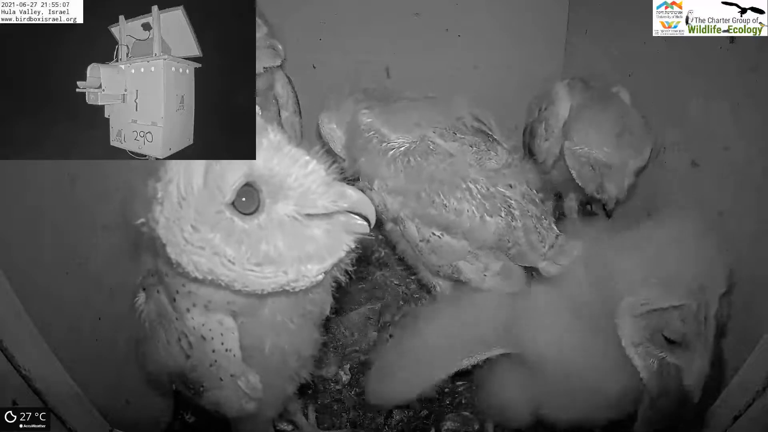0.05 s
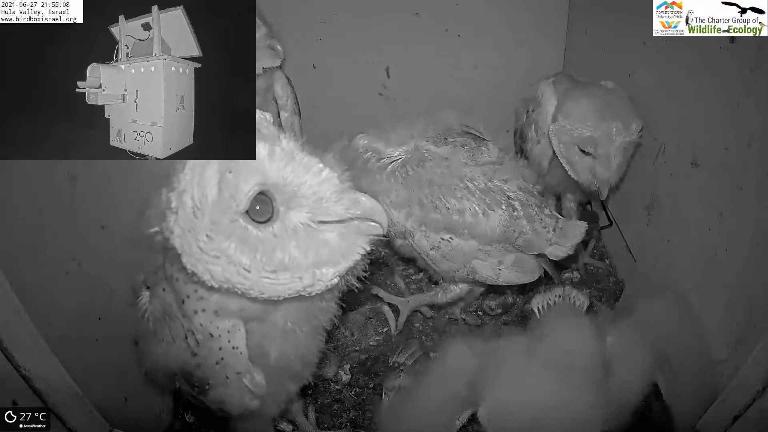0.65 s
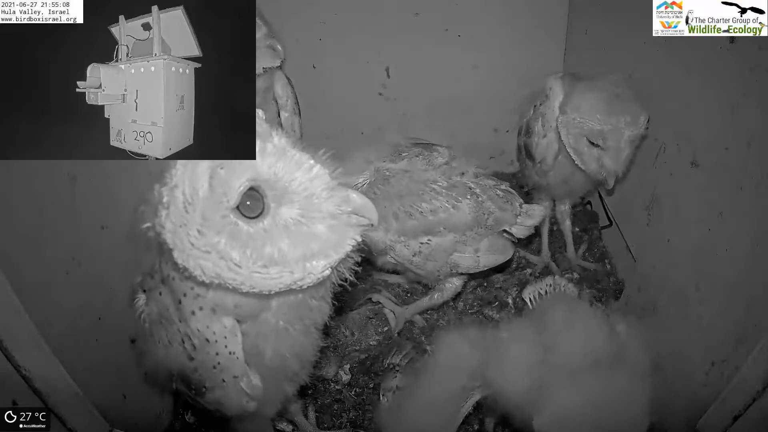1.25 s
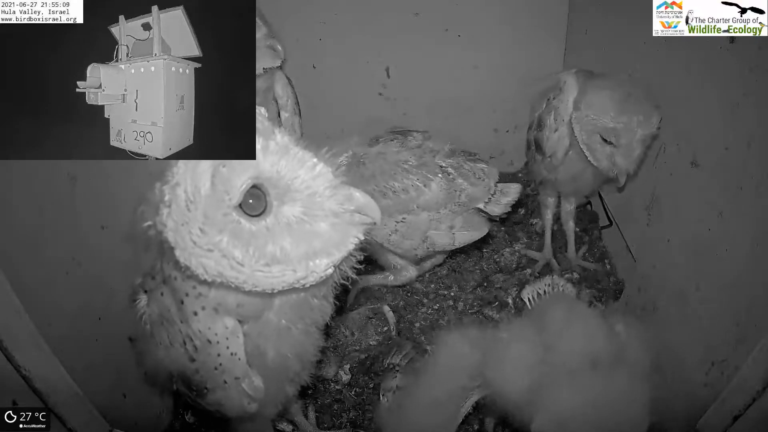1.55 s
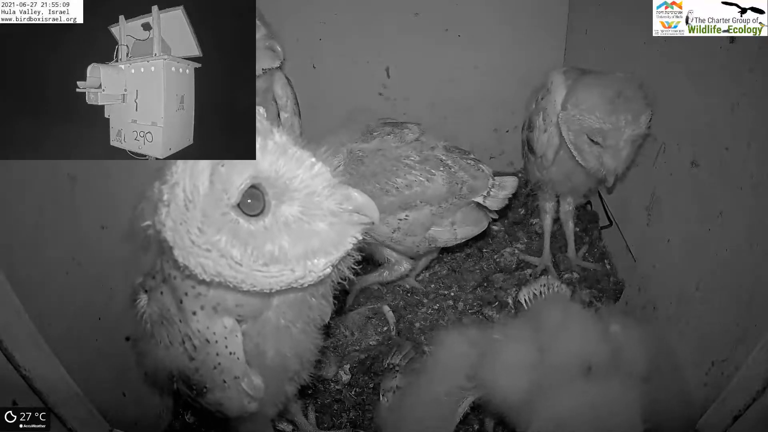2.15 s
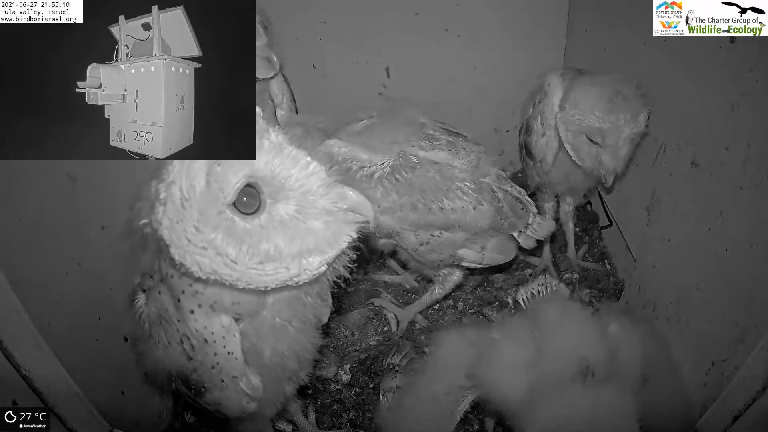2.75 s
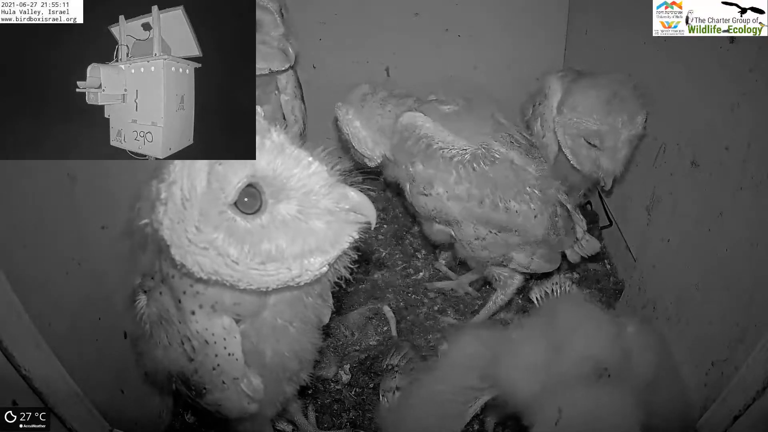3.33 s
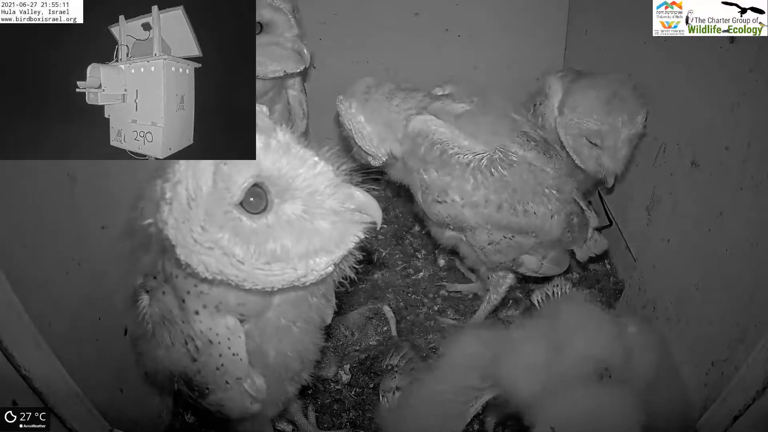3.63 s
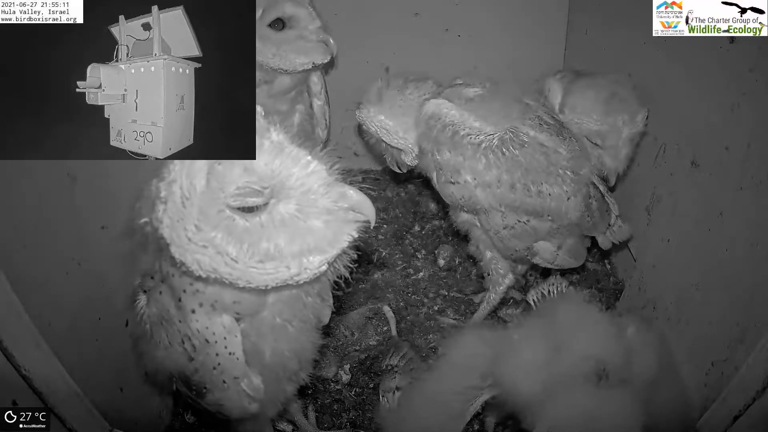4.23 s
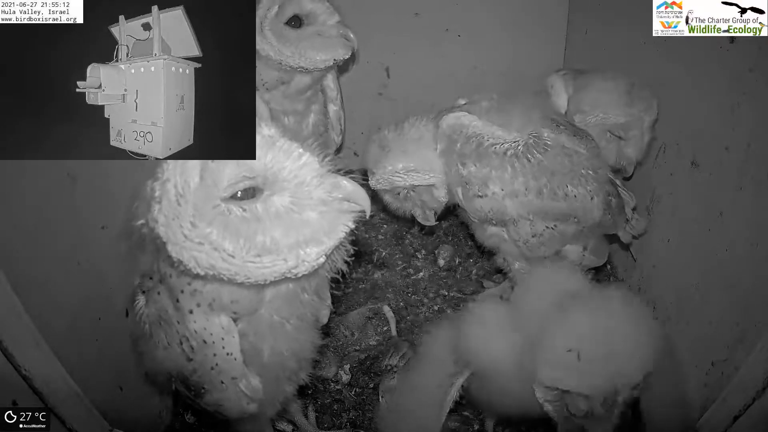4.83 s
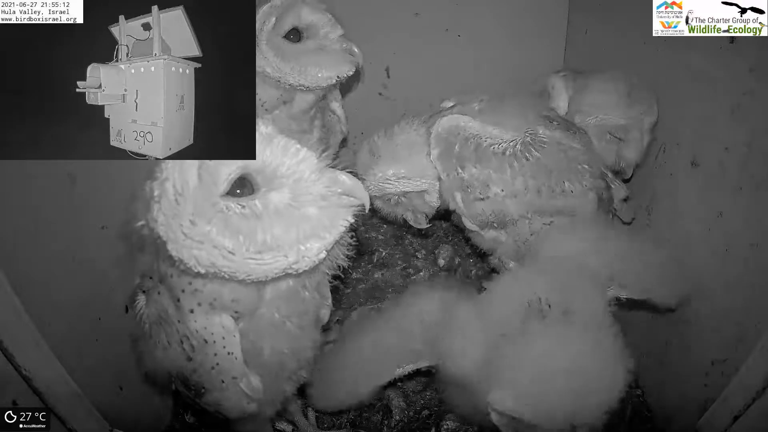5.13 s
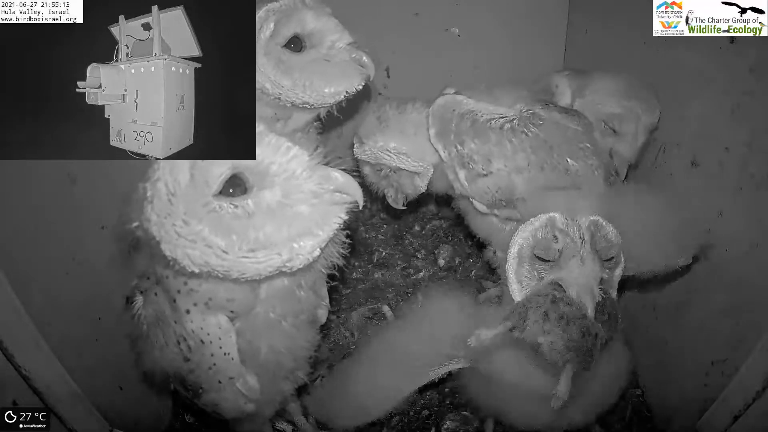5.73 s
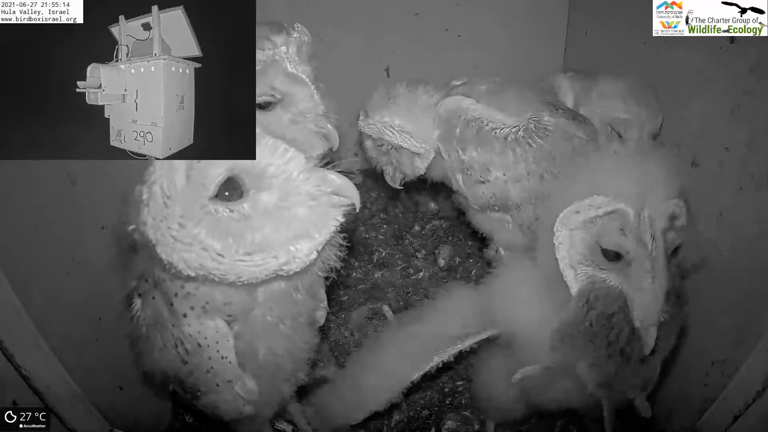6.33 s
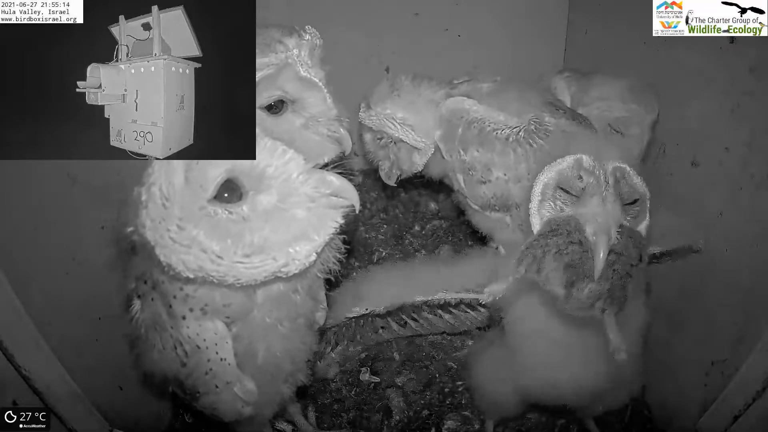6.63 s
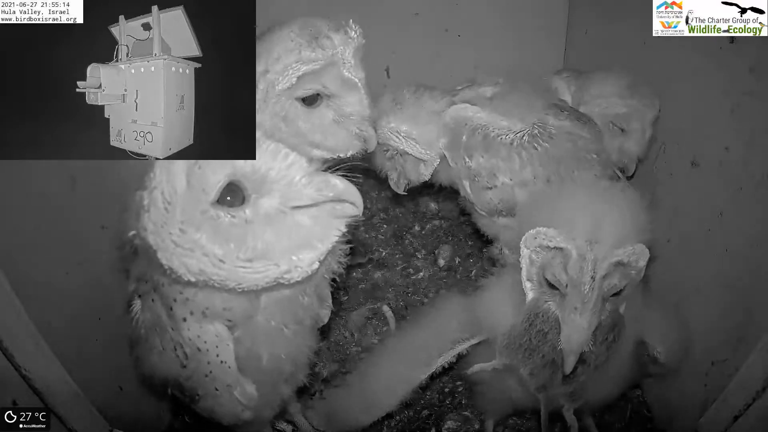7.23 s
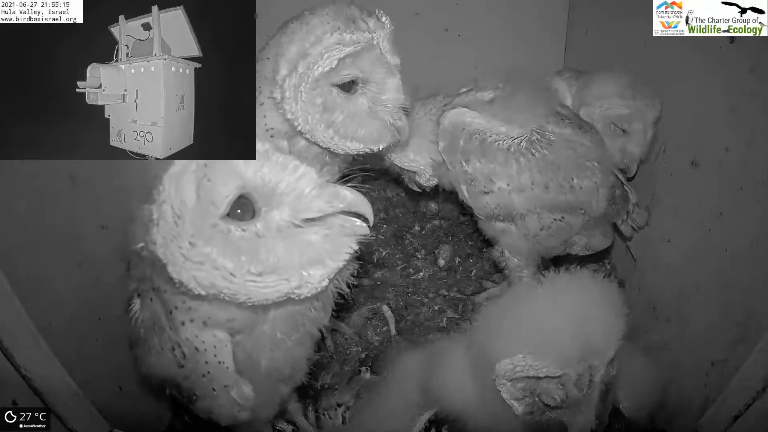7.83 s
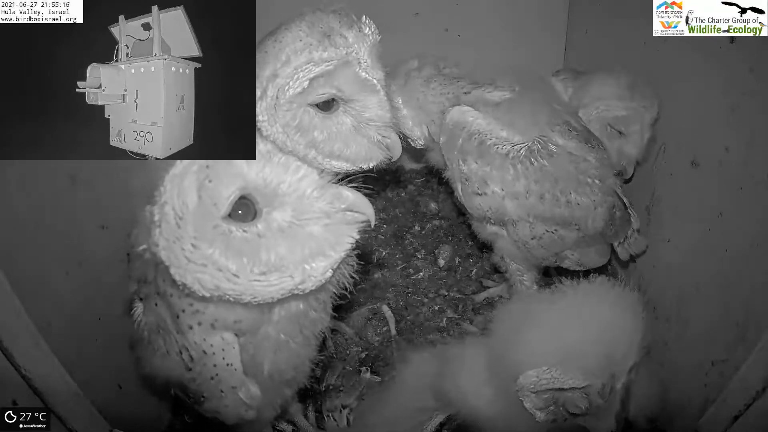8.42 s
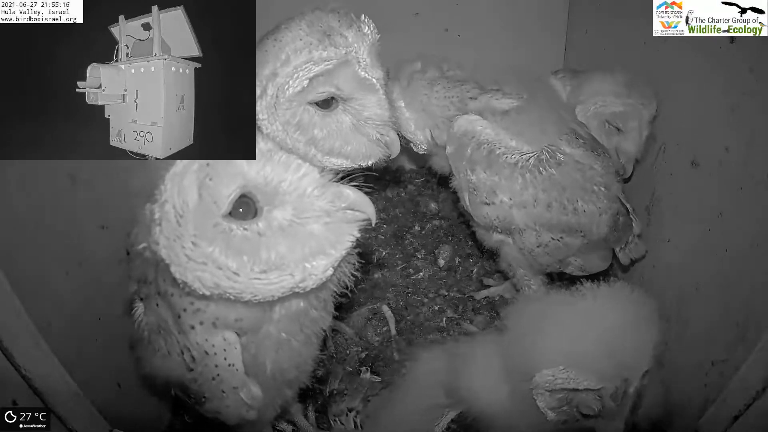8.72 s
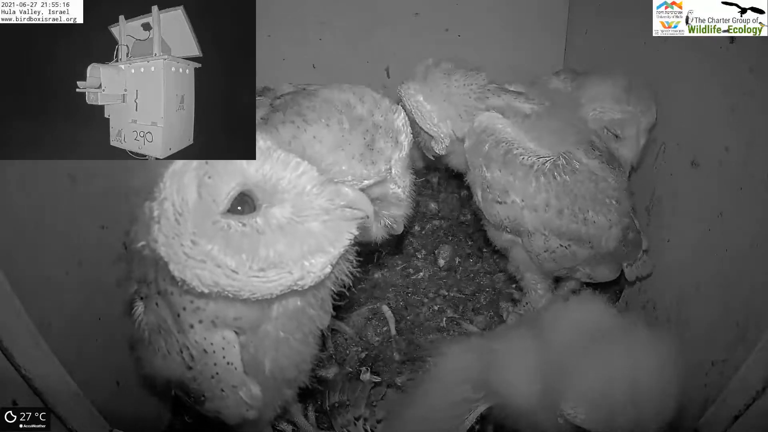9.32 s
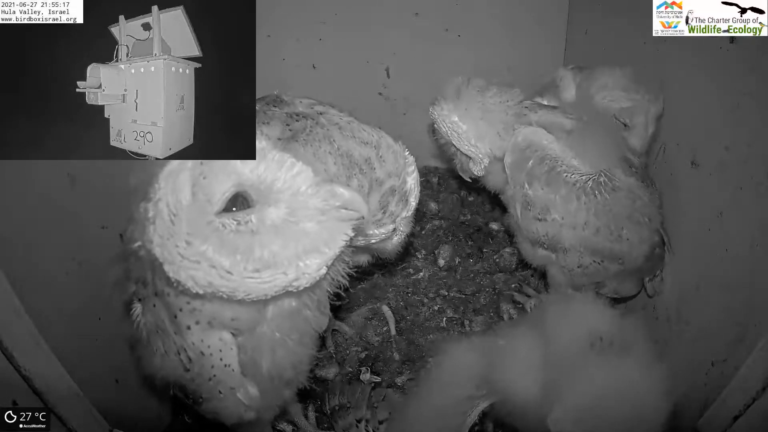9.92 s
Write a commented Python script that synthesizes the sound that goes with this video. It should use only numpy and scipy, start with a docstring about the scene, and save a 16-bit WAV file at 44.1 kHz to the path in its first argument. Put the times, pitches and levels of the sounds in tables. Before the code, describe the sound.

Barn owl chicks beg inside a nest box at night, heard close and in mono. Seven long, rasping hisses come in turn, each lasting just under a second, swelling and ending with a tiny falling note as the beak shuts. The first is under way at the start; the others begin at about 1.2, 2.5, 4.1, 5.4, 7.2 and 8.6 seconds. The first, third and sixth are loudest, the second softest. Feet thump on the hollow floor with dry claw ticks, clustering around 0.7 to 1.7 seconds and 2.4 to 4.6 seconds, then thinning out. Down rustles softly against the litter near 5 and 6.7 seconds. A sharp dry click and a thump land at 7.3 seconds, and a few more steps and ticks follow from 9.2 to 9.8 seconds. Very faint crickets and a slight low rumble lie underneath.

```python
"""Long rasping hisses: barn owl chicks beg in a nest box at night, heard close and in mono. Each call is
turbulent air coloured by throat, beak and box; it swells, then ends in a falling note as the beak closes. Feet
thump on the drumming floor, claws tick and down rustles on the litter; a few short dry clicks sound now and
then. Crickets sing faintly outside."""
import sys
import numpy as np
from scipy import signal
from scipy.fft import rfft, irfft, next_fast_len
from scipy.io import wavfile

SR = 44100
rng = np.random.default_rng(int(sys.argv[2]) if len(sys.argv) > 2 else 0)


def master_out(mix):
    """Clip the mix to full scale and print it as 16-bit PCM to the path in sys.argv[1]."""
    frames = np.transpose(np.atleast_2d(mix))
    ceiling = np.clip(frames, -1, 1)
    pcm = np.round(ceiling * 32767).astype(np.int16)
    wavfile.write(sys.argv[1], SR, pcm)


N = 439677
T = np.arange(N) / SR


def undb(db):
    """Decibels to gain."""
    return 10 ** (np.asarray(db) / 20)


def unit(x):
    """Scale to an rms of 1."""
    return x / np.sqrt(np.mean(x ** 2) + 1e-20)


def shape(x, gain):
    """Filter by a gain that is a function of frequency."""
    size = next_fast_len(len(x))
    return irfft(rfft(x, size) * gain(np.fft.rfftfreq(size, 1 / SR)), size)[:len(x)]


def colour(x, spectrum):
    """Filter by (freq_hz, level_db) points joined on a log-frequency axis."""
    hz, db = np.transpose(spectrum)
    return shape(x, lambda f: undb(np.interp(np.log(f + 1), np.log(hz), db)))


def band(f, lo_hz, hi_hz):
    """Gain of a steep band-pass."""
    return 1 / ((1 + (lo_hz / (f + 1)) ** 16) * (1 + (f / hi_hz) ** 16))


def bell(f, centre_hz, width_hz):
    """Gaussian peak of height 1."""
    return np.exp(-2 * ((f - centre_hz) / width_hz) ** 2)


def walk(rate_hz, size):
    """Random wander, rms about 1.2."""
    knots = rng.standard_normal(4096 + size // 8)
    return 1.5 * np.interp(np.arange(size) * rate_hz / SR, np.arange(len(knots)), knots)


def add(out, start_s, x):
    """Mix x in at start_s."""
    i = int(start_s * SR) + np.arange(len(x))
    inside = (i >= 0) & (i < N)
    out[i[inside]] += x[inside]


# noise floor: freq_hz, density_db
NOISE_FLOOR = [(20, -73.5), (45, -79), (72, -71), (100, -86), (150, -102), (300, -106), (700, -117),
               (1500, -114), (3000, -117), (9000, -119), (15500, -111)]

def background(tone_hz=1310, tone_db=-88):
    """Low rumble, microphone hiss and a faint wavering tone."""
    noise = colour(rng.standard_normal(N), NOISE_FLOOR) * np.sqrt(SR / 2)
    pitch_hz = tone_hz + 15 * walk(82, N)
    return noise + undb(tone_db) * unit(np.sin(2 * np.pi * np.cumsum(pitch_hz) / SR))


# far crickets: centre_hz, width_hz, level_db
CRICKET_BANDS = [(3600, 330, -73), (5080, 450, -72.5)]
# nearest cricket: start_s, level_db
CRICKET_CHIRPS = [(.93, -67), (2.041, -66), (2.425, -63.5), (3.47, -65), (3.78, -66), (4.79, -66),
                  (5.199, -62.5), (6.35, -62.5), (6.61, -63), (6.905, -60.5), (8.085, -61.5), (8.335, -65)]

def crickets(stroke_hz=29, start_hz=5130, end_hz=4720, strokes=4):
    """A distant chorus, and one nearer cricket whose wing strokes each fall in pitch."""
    out = np.zeros(N)
    for hz, width_hz, level_db in CRICKET_BANDS:
        out += undb(level_db) * unit(shape(rng.standard_normal(N), lambda f: bell(f, hz, width_hz)))
    stroke = np.arange(int(strokes * SR / stroke_hz)) * stroke_hz / SR % 1
    pitch_hz = start_hz + (end_hz - start_hz) * stroke
    chirp = np.sin(np.pi * stroke ** 2) ** 2 * np.sin(2 * np.pi * np.cumsum(pitch_hz) / SR)
    for start_s, level_db in CRICKET_CHIRPS:
        add(out, start_s, undb(level_db) * chirp)
    return out


# scratched litter: freq_hz, level_db
LITTER_SPECTRUM = [(300, 7.5), (600, 2), (1400, -1), (2800, -7.5), (5000, -6.5), (8000, -11.5),
                   (15000, -29)]

def litter(size, grain=1):
    """Friction noise of dry litter, rms 1."""
    return unit(colour(rng.standard_normal(size) * grain, LITTER_SPECTRUM))


# a chick shuffles: centre_s, half_length_s, level_db
DOWN_SHUFFLES = [(0.802, 0.16, -73.5), (4.984, 0.027, -60.5), (5.11, 0.11, -65), (5.39, .03, -62.5),
                 (6.674, 0.086, -65), (6.906, 0.22, -77), (8.301, .07, -77.5)]

def rustle(stir_db=-83.5):
    """Down brushes the litter in uneven grains; the brood is never quite still."""
    motion = undb(stir_db)
    for centre_s, half_length_s, level_db in DOWN_SHUFFLES:
        motion = motion + undb(level_db) * np.exp(-((T - centre_s) / half_length_s) ** 2)
    return litter(N, grain=undb(2.5 * walk(140, N))) * motion


# dry ticks: start_s, level_db, decay_s
DRY_TICKS = [(.671, -47, 0.0061), (2.143, -64.5, .004), (5.128, -51.5, 0.011), (6.647, -56, 0.0044),
             (7.103, -65.5, 0.0069), (7.207, -46.5, 0.0038), (7.319, -32.5, 0.0077), (9.703, -38, 0.0014),
             (9.79, -39.5, 0.00065)]

def ticks(out):
    """Short dry clicks of decaying noise."""
    t = np.arange(SR // 10) / SR
    for start_s, level_db, decay_s in DRY_TICKS:
        add(out, start_s, undb(level_db) * litter(len(t)) * np.exp(-t / decay_s))


# floor modes: freq_hz, level_db, t60_s
BOX_FLOOR = [(75.66, 3.5, 0.56), (87.7, 1, 0.69), (95, 13, 0.18), (125, -11, 0.47), (168, -0.5, 0.15),
             (194.3, 2.5, 0.1), (248.6, -4, .13), (323, -11, 0.1), (417.3, -9.5, 0.073), (550.6, -24, 0.17)]

def floor_ring(t, split_hz=110):
    """The floor's deep and upper modes; every spot favours different ones."""
    deep, upper = np.zeros((2, len(t)))
    for hz, level_db, t60_s in BOX_FLOOR:
        detune, scatter_db = rng.standard_normal(2) * (.012, 2.5)
        group = deep if hz < split_hz else upper
        group += undb(level_db + scatter_db - 60 * t / t60_s) * np.sin(2 * np.pi * hz * (1 + detune) * t)
    return deep, upper


# steps: start_s, thump_db, hardness_db (upper modes re deep), claw_db (before claw_boost_db)
FOOTFALLS = [(0.003, -39.5, -16, -66), (0.706, -35.5, -19, -46), (0.792, -24.5, -10.5, -46.5),
             (0.899, -38.5, -9.5, -57.5), (1.004, -41.5, -11, -61), (1.158, -33.5, -20, -52),
             (1.565, -35.5, -37.5, -63), (1.625, -32.5, -3.5, -63), (1.736, -32.5, -6, -57),
             (2.411, -30.5, -19.5, -51), (2.554, -37, -8.5, -67), (2.871, -28, -15, -45.5),
             (3.155, -30, -10, -60), (3.266, -31.5, -9.5, -54.5), (3.548, -36.5, -1.5, -44),
             (3.592, -26.5, -20, -49.5), (3.671, -29.5, -6.5, -48.5), (3.713, -30, -16, -50),
             (3.93, -33, -3, -45), (4.436, -31, -2, -51), (4.555, -27.5, -7, -46.5),
             (5.041, -32, -16.5, -39), (5.45, -39, -6, -51), (5.799, -40, -4, -61), (6.19, -35.5, -8, -60),
             (6.646, -40, -5, -50.5), (7.311, -29.5, -46, -40), (9.16, -45.5, 12, -50.5),
             (9.267, -33, -9.5, -53), (9.541, -27, -2.5, -39), (9.666, -28.5, -1.5, -48)]

def footfalls(out, hard_contact_s=.003, claw_rise_s=.0015, claw_decay_s=.0085, claw_boost_db=4):
    """Feet load the floor, soft treads more slowly; it drums while a claw ticks on the litter."""
    t = np.arange(int(.6 * SR)) / SR
    for start_s, thump_db, hardness_db, claw_db in FOOTFALLS:
        deep, upper = floor_ring(t)
        contact_s = hard_contact_s * undb(-.25 * min(hardness_db, 0))
        press = 1 - np.exp(-(t / contact_s) ** 2)
        for modes, level_db in (deep, thump_db), (-upper, thump_db + hardness_db):
            thump = press * modes
            add(out, start_s, undb(level_db) * thump / np.std(thump[:SR // 20]))
        claw = litter(len(t)) * np.exp(-t / claw_decay_s) * np.minimum(t / claw_rise_s, 1)
        add(out, start_s, undb(claw_db + claw_boost_db) * claw)


# closing notes: peak_s, level_db
BEAK_CLOSINGS = [(.675, -61), (1.98, -52.5), (3.412, -49), (4.795, -43.5), (6.342, -45.5), (8.127, -45),
                 (9.44, -46)]

def beak_closings(out, start_hz=1700, end_hz=1020, fall_s=.0055, breath_hz=210, lead_s=.059):
    """The mouth resonance slides down as the beak shuts: a breathy note of three harmonics."""
    t = np.arange(int(.09 * SR)) / SR - lead_s
    pitch_hz = end_hz + (start_hz - end_hz) / (1 + np.exp((t + .011) / fall_s))
    phase = 2 * np.pi * np.cumsum(pitch_hz) / SR
    envelope = np.exp(-(t / np.where(t < 0, .025, .011)) ** 2)
    for peak_s, level_db in BEAK_CLOSINGS:
        note = 0
        for harmonic, db in enumerate([0, -7, -13], 1):
            breath = walk(breath_hz, len(t)) + 1j * walk(breath_hz, len(t))
            note += undb(db) * unit(np.real(breath * np.exp(1j * harmonic * phase)))
        add(out, peak_s - lead_s, undb(level_db) * note * envelope)


def echo_paths(count=28):
    """Reflections at one place in the box: delay_s, sway_share, sign."""
    delays_s = np.geomspace(.0014, .015, count) * rng.uniform(.96, 1.04, count)
    return np.column_stack([delays_s, rng.uniform(-1.2, 1, count), rng.choice([-1, 1], count)])


# chicks in the box: sway_scale_m, retreat_m_per_s, wall_delay_s, wall_db, echo_db (at zero delay)
CHICK_PLACES = [(.012, 0, .0016, -22, -17), (.025, .04, .0014, -7.5, -12), (.011, 0, .0019, -19, -14)]

def walls(x, chick, paths, fade_db_per_s=900):
    """Quick reflections ripple the treble; their paths shift as the chick moves."""
    sway_scale_m, retreat_m_per_s, wall_delay_s, wall_db, echo_db = CHICK_PLACES[chick]
    n = np.arange(len(x))
    delayed = lambda delay_s, extra_m: np.interp(n - SR * (delay_s + extra_m / 343), n, x, left=0)
    # backing away from the nearest wall slides its comb of peaks down
    echoes = undb(wall_db) * delayed(wall_delay_s, retreat_m_per_s * n / SR)
    head_m = sway_scale_m * walk(2.5, len(x))
    for delay_s, sway_share, sign in paths:
        echoes += sign * undb(echo_db - fade_db_per_s * delay_s) * delayed(delay_s, sway_share * head_m)
    return x + shape(echoes, lambda f: band(f, 3000, 20000))


# throat turbulence: freq_hz, level_db
THROAT_SPECTRUM = [(100, -31.5), (270, -17.5), (400, -20), (750, -22), (1100, -10.5), (2200, -9),
                   (3000, -4), (4000, 1.8), (5300, 3), (7400, -0.66), (10000, -8), (12000, -17.5),
                   (15000, -29)]
# box peaks and dips: centre_hz, width_hz, gain_db
BOX_RESONANCES = [(505, 75, -3.5), (587, 100, 10.5), (750, 100, -6.5), (1396, 40, 9), (1969, 75, 7),
                  (2164, 430, -3), (2785, 240, 9.5), (2814, 70, 2), (3267, 260, -3), (4258, 170, 3),
                  (7175, 430, 4), (8460, 480, -4.5)]

def rasp(pose, chick, paths, flutter_hz=45):
    """One second of a fluttering air jet, coloured by throat, beak and box."""
    jet = rng.standard_normal(SR) * undb(.41 * walk(flutter_hz, SR))
    voice = colour(walls(jet, chick, paths), THROAT_SPECTRUM)
    peaks = BOX_RESONANCES + list(pose)
    return shape(voice, lambda f: undb(sum(db * bell(f, hz, width_hz) for hz, width_hz, db in peaks)))


# registers (throat air, hiss body, upper hiss, top): attack_s, attack_db, arch_share, release_db, tilt_share
HISS_BANDS = [(.04, 5.5, 0.34, 9.5, 0.13), (.05, 25, 1.084, 34.5, 0), (.027, 38, .85, 40, 0.4),
              (0.026, 32, 0.83, 38.5, 0.93)]
# register boundaries: edge_hz
BAND_EDGES_HZ = [120, 2300, 6200, 8300, 20000]

def hiss(voice, call, onset_s=.0017, cut_s=.031):
    """Effort arches to a crest and releases, each register following; the gape tilts the treble."""
    start_s, crest_s, end_s, release_s, swell_db, sag_db, hiss_db, air_db, top_re_hiss_db, tilt_db_per_s = call
    t = np.arange(SR) / SR + start_s
    band_rms = lambda lo_hz, hi_hz: np.std(shape(voice, lambda f: (f > lo_hz) & (f < hi_hz)))
    air = undb(air_db) / band_rms(900, 2100)
    body = undb(hiss_db) / band_rms(2600, 8000)
    top = undb(hiss_db + top_re_hiss_db) / band_rms(8500, 15000)
    rise_db = -swell_db * ((t - crest_s) / (crest_s - start_s)) ** 2
    fall_db = -max(sag_db, 0) * ((t - crest_s) / (end_s - crest_s)) ** 2
    arch_db = np.where(t < crest_s, rise_db, fall_db)
    release = np.maximum(1 + (t - end_s) / release_s, 0) ** 2
    tilt_db = tilt_db_per_s * (t - crest_s)
    out = 0
    for k, gain in enumerate([air, body, body, top]):
        attack_s, attack_db, arch_share, release_db, tilt_share = HISS_BANDS[k]
        attack = np.exp(-(t - start_s) / attack_s)
        level_db = arch_share * arch_db + tilt_share * tilt_db - attack_db * attack - release_db * release
        out += shape(voice, lambda f: band(f, *BAND_EDGES_HZ[k:k + 2])) * gain * undb(level_db)
    return out * np.clip((t - start_s) / onset_s, 0, 1) * np.clip((end_s - t) / cut_s, 0, 1)


# calls: start_s, crest_s, end_s, release_s, swell_db, sag_db, hiss_db, air_db, top_re_hiss_db,
# tilt_db_per_s
BEGGING_CALLS = [(-.25, 0.477, 0.68, 0.072, 24, 11.5, -15, -38, -11, 4),
                 (1.18, 1.835, 1.997, 0.092, 8.5, 0, -25.5, -50, -11.5, 7.5),
                 (2.542, 3.235, 3.433, 0.13, 20, 5.5, -13.6, -39.8, -13, -1),
                 (4.087, 4.68, 4.834, 0.13, 15.5, 1.5, -22.5, -43.5, -10, 2),
                 (5.425, 6.098, 6.362, 0.12, 17.5, 2, -21.5, -41, -10.5, -6.5),
                 (7.224, 7.87, 8.147, 0.089, 20.5, 13, -16, -40, -12.5, -6.5),
                 (8.643, 9.249, 9.447, .1, 15.5, -1, -22.5, -41.4, -7, 2),
                 (9.945, 10.55, 10, 0.11, 15, 2, -17, -37.5, -18, 3)]
# peaks and dips from gape and head position, one list per call: centre_hz, width_hz, gain_db
CALL_POSES = [
    [(1620, 72, 4.0), (1870, 80, 4.5), (2275, 100, 9.5), (3450, 82, -5), (3800, 130, 8.0), (4190, 140, 5.5),
     (5200, 1040, 4.5), (5320, 99, -10.0), (6910, 300, 4.5), (7956, 560, 7.5)],
    [(1410, 410, -13.5), (2580, 450, -12.5), (3966, 130, 8.5), (4360, 330, 4), (5170, 390, 6.5),
     (5700, 600, 3), (6490, 190, 6.5), (7750, 1000, 6), (9170, 570, 3)],
    [(1500, 270, 3), (3120, 290, 3.5), (3500, 150, -7.0), (3833, 160, 6.5), (4710, 70, 7),
     (5140, 340, 10.5), (5570, 160, 10), (6110, 470, 4.0), (7300, 400, 5.5), (8520, 700, 4.5)],
    [(1745, 240, 11), (2190, 160, 9), (2624, 227, 13), (3020, 160, 12), (3240, 120, 5), (3830, 600, 6),
     (4860, 300, 5), (5240, 89, 11.5), (6170, 480, 7.5), (8580, 2440, 7.5)],
    [(1607, 100, 8), (2460, 80, 6.0), (2667, 39, 9), (3320, 43, 7.0), (3457, 70, 6.5), (4085, 160, -6.5),
     (4420, 270, -8), (6240, 560, -9), (8760, 380, 5), (9650, 460, 5.5)],
    [(1780, 210, 4.5), (2270, 120, 13.5), (2570, 120, 8.0), (2830, 250, -3.5), (3140, 180, 5.5),
     (3850, 110, 6), (4510, 760, 4.5), (6220, 800, 5.0), (8110, 530, 10), (11710, 240, 6.0)],
    [(1605, 89, 6.5), (2460, 63, 9.5), (2702, 81, 8.5), (3330, 65, 8), (4370, 76, -15), (4773, 90, 7.5),
     (5950, 270, -9), (7000, 390, 7.0), (8450, 520, 8), (9000, 62, -11)],
    [],
]
# caller of each call: chick_index
CALL_CHICKS = [0, 1, 2, 1, 2, 0, 2, 0]

def begging(out):
    """Three chicks hiss in turn, each from its own place in the box."""
    paths = [echo_paths() for _ in CHICK_PLACES]
    for call, pose, chick in zip(BEGGING_CALLS, CALL_POSES, CALL_CHICKS):
        add(out, call[0], hiss(rasp(pose, chick, paths[chick]), call))


def scene():
    """The brood over the night outside, the same in both channels."""
    out = background() + crickets() + rustle()
    begging(out)
    beak_closings(out)
    footfalls(out)
    ticks(out)
    return np.array([out, out])


def record(dry):
    """Steep low-pass at 15750 Hz."""
    return signal.sosfilt(signal.ellip(12, .2, 80, 15750, fs=SR, output="sos"), dry)


dry = scene()
out = record(dry)
master_out(out)
```